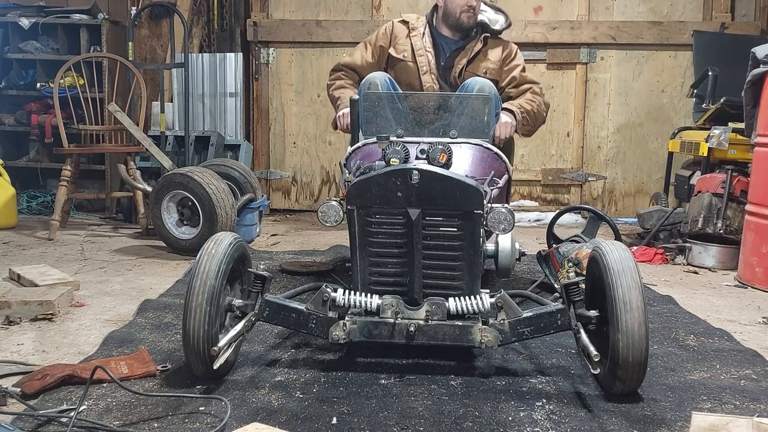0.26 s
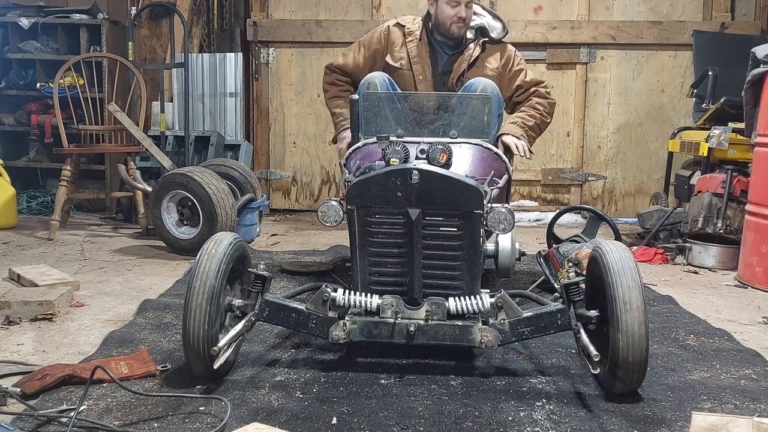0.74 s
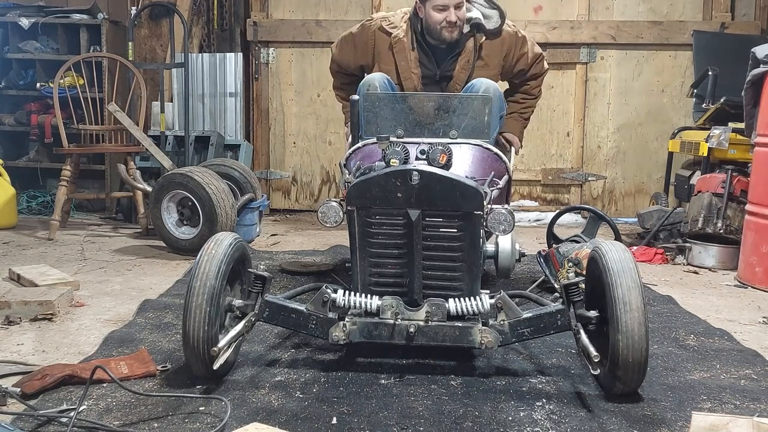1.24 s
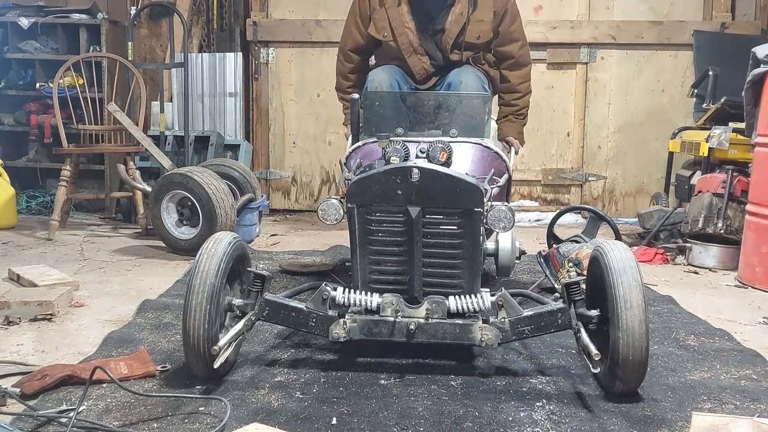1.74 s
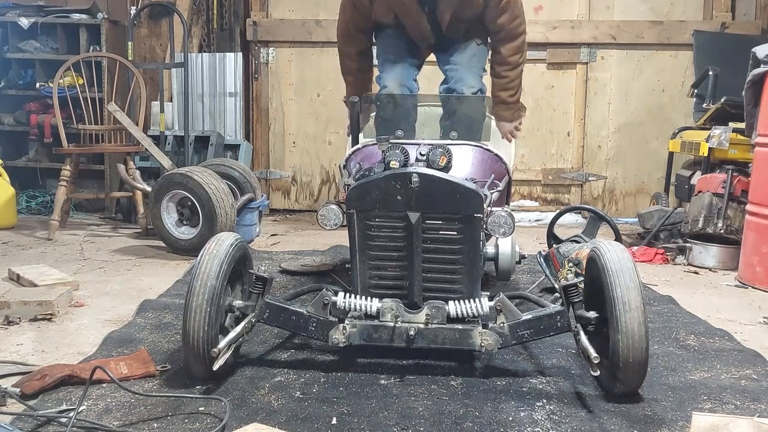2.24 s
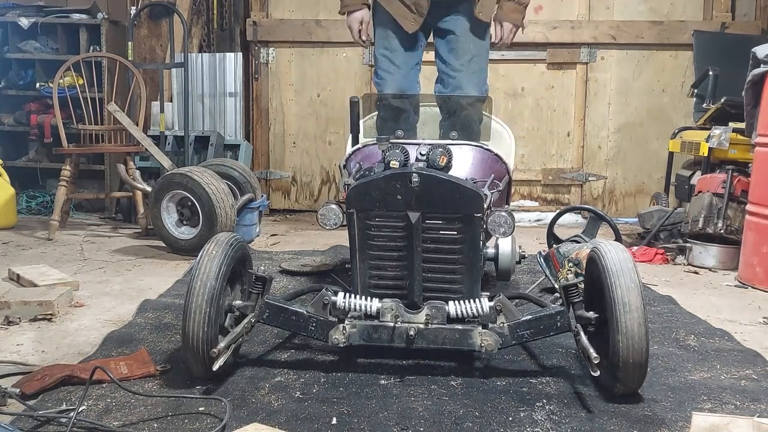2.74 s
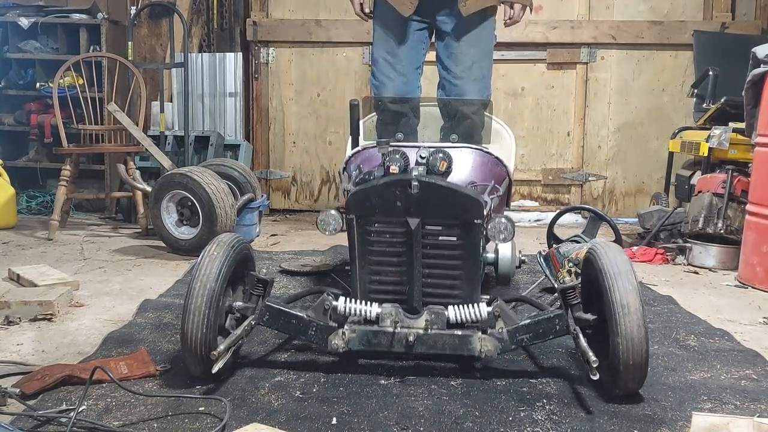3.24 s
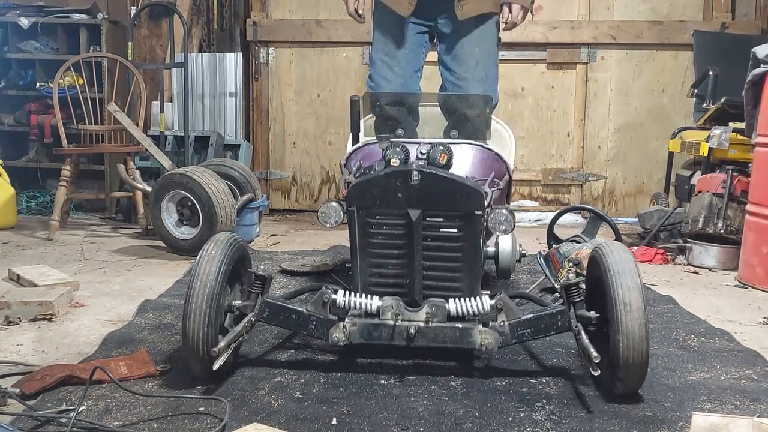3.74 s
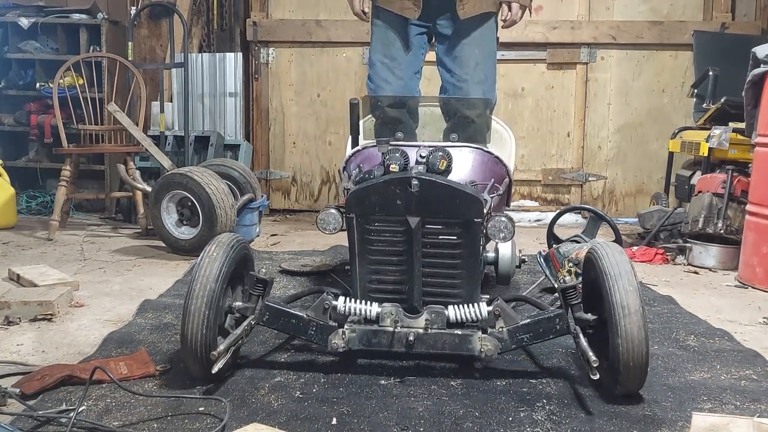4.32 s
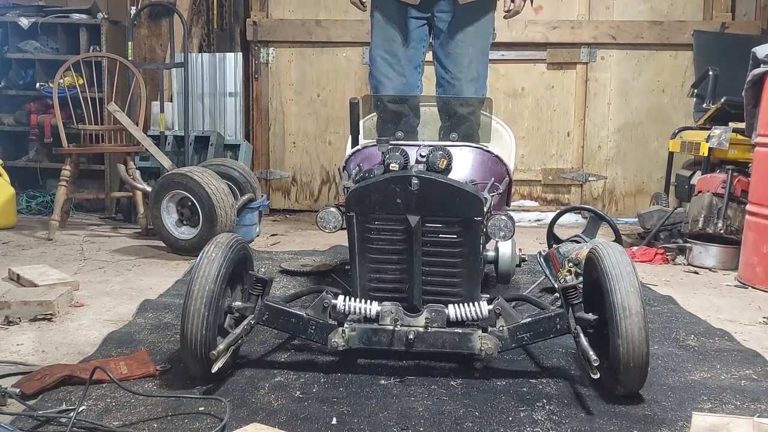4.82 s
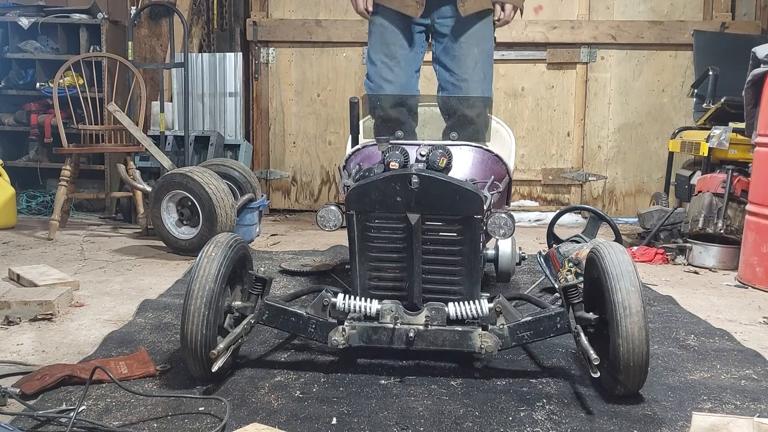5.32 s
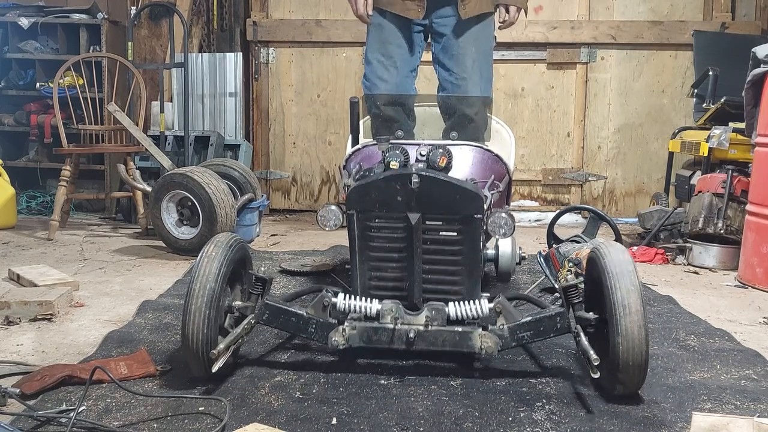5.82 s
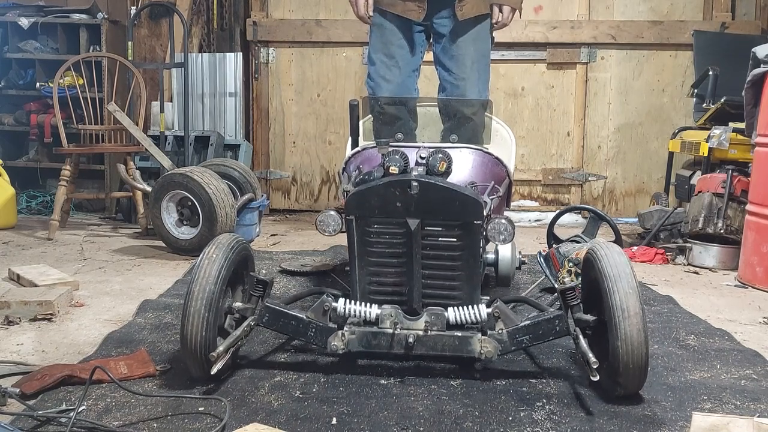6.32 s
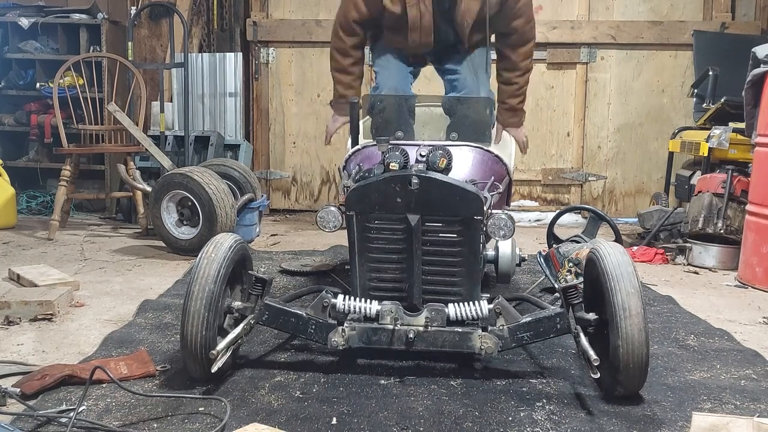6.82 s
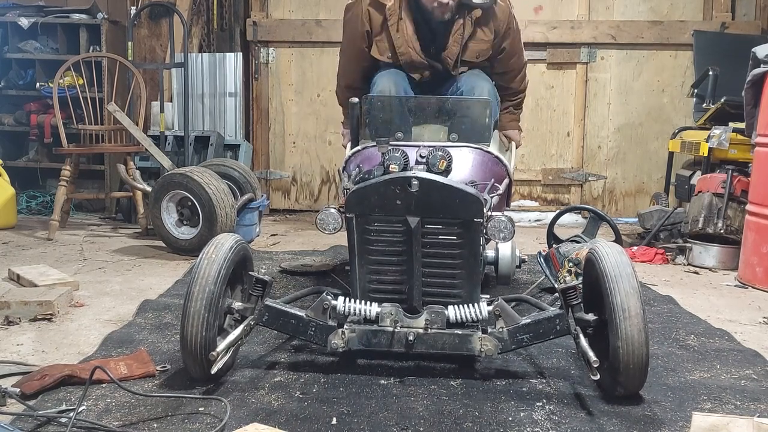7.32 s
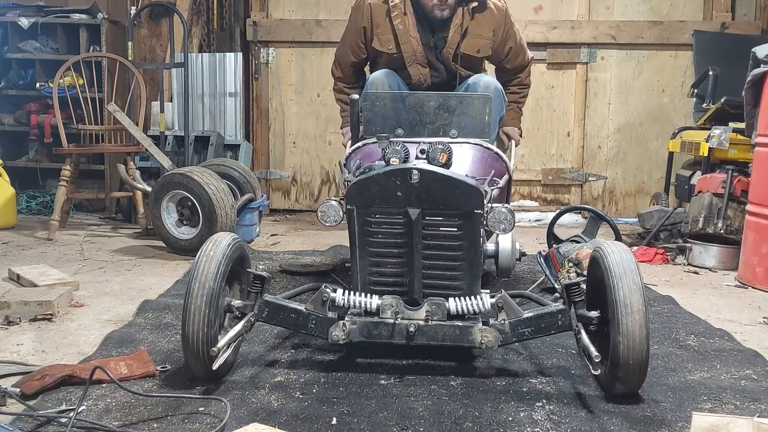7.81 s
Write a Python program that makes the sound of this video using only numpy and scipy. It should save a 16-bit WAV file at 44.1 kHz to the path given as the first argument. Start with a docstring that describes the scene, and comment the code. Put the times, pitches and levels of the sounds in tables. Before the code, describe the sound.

Close to a go-kart inside a workshop: light cloth rubbing and soft bumps, then a rapid run of deep body thuds with hard metal clunks. Quiet creaks follow, then busy suspension rattling with bright little clinks and dull tyre boom. It nearly stops, rumbles up again with scattered knocks, and settles after a low thud. Short wooden-room echo and slight steady hiss surround it.

```python
"""Soft thuds and shudders come first, over faint hiss: someone shifts weight, stands and bounces on a steel go-kart.
Slipping joints and blows excite the hollow body's modes; filtered noise makes the tyre boom and the hiss.
Random clicks make rattle and rubbing, knocks add bursts and short rings, narrow noise makes the creaks.
Loose steel parts clink as clusters of decaying sines, and feedback delays make the wooden workshop ring on."""
import sys
import numpy as np
from scipy import signal
from scipy.fft import rfft, irfft, next_fast_len
from scipy.io import wavfile

SR = 44100
rng = np.random.default_rng(int(sys.argv[2]) if len(sys.argv) > 2 else 0)


def file_out(sig):
    """Save sig as 16-bit WAV at sys.argv[1]."""
    # one column per channel
    cols = np.atleast_2d(sig).T
    # limit, then scale
    lim = np.clip(cols, -1, 1)
    pcm = np.round(lim * 32767).astype(np.int16)
    wavfile.write(sys.argv[1], SR, pcm)


N = 355518

# Levels in the event tables set the balance within a layer; the layer's function trims them.
# weight landing on the body: time_s, blow_level_db, strongest_pitch_hz, shudder_level_db,
# deep_panels_db (above the shudder)
THUMPS = [(0.042, -48.5, 302, -50, -22), (0.153, -34, 206, -32, -10), (0.244, -55, 248, -39.5, 3),
          (0.502, -47.5, 115, -60, 7), (0.959, -59, 210, -61, 2.5), (1.545, -45, 200, -43, -3),
          (1.569, -16.5, 151, -26.5, 4), (1.688, -17.5, 168, -24, 1), (1.743, -23, 235, -33.5, -5),
          (1.785, -10.5, 228, -18, 6), (1.86, -36.5, 231, -29, 1), (2.054, -34, 286, -31, -7.5),
          (2.305, -27.5, 192, -32, -2.5), (2.574, -33.5, 224, -42, -3.5), (2.861, -55, 153, -56, -2),
          (3.049, -55, 269, -41, -7), (3.207, -47, 213, -37, -5), (3.348, -44, 248, -34.5, -6),
          (3.57, -45, 293, -36, -14), (3.731, -33, 166, -37.5, -19), (3.907, -33.5, 229, -46.5, -2.5),
          (4.546, -39, 114, -53.5, 4), (5.42, -50.5, 236, -59, -17), (5.626, -33.5, 230, -33, -8.5),
          (5.703, -36, 229, -38, -12), (5.758, -47, 245, -45, -19), (6.627, -54, 229, -41, -12),
          (6.864, -40, 228, -56.5, 0), (7.515, -26.5, 162, -31, -14), (7.61, -40, 250, -46.5, 0.5),
          (7.861, -52.5, 123.4, -70.5, 5)]
# joints knocking: start_s, level_db, ring_pitch_hz, treble_level_db, sizzle_level_db, t60_s, left_over_right_db
KNOCKS = [(0.043, -58, 2350, -89, -96, 0.41, 3), (0.159, -47.5, 1230, -86, -77, 0.75, 2),
          (0.242, -47.5, 1780, -49.5, -59, 0.37, 2), (0.825, -63, 2040, -48.5, -52, 0.38, 1.5),
          (0.938, -68, 3290, -53.5, -75, 0.26, 0), (1.076, -58, 2360, -61.5, -68, 1, 4),
          (1.295, -65.5, 1280, -74, -99, 0.78, 10), (1.549, -69, 600, -83, -90, 0.12, -2),
          (1.576, -40.5, 1300, -61, -95, 0.56, 1), (1.686, -25.5, 1460, -65, -75, 0.46, 0.5),
          (1.786, -25.5, 1190, -35, -47, 0.27, -1), (1.871, -27, 3270, -42.5, -44, 0.31, 0),
          (2.056, -58, 1240, -61.5, -86, 0.27, 0.0), (2.318, -45.5, 1690, -63, -60, 0.14, 2),
          (2.793, -55, 1330, -64, -65, 0.55, 2), (2.899, -48.5, 1740, -62, -83, 0.23, 4),
          (2.927, -50, 1810, -62, -70, 0.17, 0), (3.077, -44, 2160, -55, -71, 0.51, 4),
          (3.092, -44, 2830, -41.5, -59, 0.5, 0), (3.162, -33.5, 2530, -66, -50.5, 0.25, 1),
          (3.248, -31.5, 1780, -73, -78, 0.1, 0), (3.318, -51, 1510, -64, -70, 0.43, 3),
          (3.407, -39, 1430, -58, -77, 0.095, -1), (3.483, -46, 2200, -55, -64, .1, -1),
          (3.493, -32, 2100, -53, -59, 0.21, 3.5), (3.558, -36.5, 1770, -65, -76, 0.31, 1),
          (3.723, -36, 1480, -66, -83, 0.13, 0.5), (3.82, -45.5, 2250, -69, -82, 0.33, 1),
          (3.853, -34, 2220, -58.5, -56.5, 0.33, 1.5), (3.948, -51, 1410, -63, -84, 0.19, 1),
          (4.409, -66.5, 2320, -92, -88, 0.2, 1.0), (4.464, -67.5, 1490, -86, -90, 0.13, 9),
          (5.414, -50, 2160, -54.5, -64, 0.25, 2), (5.505, -53, 2480, -88, -91.5, 0.21, 4.5),
          (5.598, -46.5, 700, -78, -87, 0.24, 1), (5.618, -39.5, 2900, -81, -87, 0.25, 2.5),
          (5.713, -53, 1500, -82, -85, 0.19, 1), (5.753, -34, 1330, -48, -59, 0.34, 1),
          (5.898, -35.5, 2460, -61, -57, 0.29, 0.5), (5.992, -65, 1720, -71, -82, 0.23, -3),
          (6.155, -42.5, 1360, -54.5, -73, 0.23, 2), (6.271, -52, 1310, -90, -88, 0.26, 4),
          (6.485, -39, 1380, -55.5, -86, 0.42, 1.5), (6.652, -42, 1950, -65, -68, 0.6, 1.5),
          (6.927, -58, 2010, -69, -82, 0.21, 6), (7.498, -42, 3030, -51.5, -58, 0.32, 3),
          (7.607, -61, 1300, -85, -82, 0.18, 2)]
# faint creaks: start_s, length_s, pitch_hz, level_db
CREAKS = [(0.054, 0.081, 2360, -77), (1.13, 0.11, 572, -71), (1.462, 0.086, 610, -67),
          (2.21, 0.098, 516, -58.5), (0.838, 0.17, 1304, -62.5), (4.46, 0.072, 1420, -73),
          (4.467, 0.12, 280, -69), (4.69, 0.13, 1990, -74.5), (4.7, 0.12, 1323, -82),
          (5.285, 0.043, 870, -76), (6.928, 0.057, 2040, -69), (7.118, 0.21, 2560, -72.5),
          (7.621, 0.41, 1350, -71), (5.419, 0.066, 2220, -64), (5.615, 0.026, 2900, -59),
          (0.953, 0.12, 970, -64), (1.311, 0.3, 1570, -70), (1.354, 0.17, 2956, -70)]
# modes of the hollow body, deepest first: pitch_hz, width_hz, level_db
BODY_MODES = [(111.5, 16, -5.5), (125.4, 25, -8.5), (152.5, 23, -5), (201.3, 48, -7), (236.3, 17.5, -4.5),
              (282.4, 23, -10), (328.7, 36, -6.5), (408.7, 84, -11.5), (528, 65, -14.5), (628, 75, -17),
              (726, 270, -19.5), (950, 83, -28.5)]
# colour of the rattling joints: pitch_hz, level_db (per Hz)
RATTLE_COLOUR = [(400, -1), (600, 1), (1000, -5), (1500, -5.5), (2300, -11.5), (2950, -15), (3400, -34),
                 (5000, -20)]
# colour of the rubbing: pitch_hz, level_db (per Hz)
RUB_COLOUR = [(1470, -29), (2500, 4.5), (2660, -8), (3420, -5.5), (4670, -7.5), (6560, -9), (10100, -16),
              (11500, -14.5), (15000, -45.5), (22000, -120)]
# colour of the room hiss: pitch_hz, level_db (per Hz)
HISS_COLOUR = [(18, -21.5), (30, -6.5), (93, -3.5), (194, -7), (245, -5.5), (328, -7.5), (801, -17),
               (2480, -21), (6050, -28), (8740, -14), (12300, -30), (13300, -44), (16000, -42)]
# stereo likeness: pitch_hz, likeness (1 same in both ears, 0 unrelated, -1 opposed)
LIKENESS = [(60, .99), (250, .95), (500, .8), (1000, .1), (2000, .2), (4000, -.2), (12000, -.05)]
# a loose steel rod: pitch_hz, level_db, t60_s
ROD_MODES = [(1515, -4, .1), (2850, 2, .13), (4490, -6, .12), (5750, -9, .18), (6420, -8, .16),
             (7390, -18, .12), (8390, -11, .15), (10200, -13, .18), (11800, -14, .15), (12600, -14, .15),
             (14100, -15, .15), (15300, -18, .12)]
# touches of the rod: start_s, level_db, brightest_pitch_hz
ROD_HITS = [(3.092, -35.5, 2850), (3.095, -37, 6500), (3.105, -41, 2850), (3.12, -36.5, 2930),
            (3.1, -41, 12180), (3.125, -46, 9000), (3.135, -44, 2850), (3.141, -36, 4900),
            (3.149, -43, 3200), (3.175, -49, 5300), (3.201, -46.5, 5550), (3.309, -40.5, 1500),
            (3.317, -48.5, 2830), (3.33, -39.5, 1500), (3.345, -45.5, 2380), (1.69, -56, 1508),
            (5.414, -58.5, 4460)]
# a steel bracket: pitch_hz, level_db, t60_s
BRACKET_MODES = [(1270, 0, .2), (2918, -8, .25), (3300, -4, .12), (4533, -2, .18), (4727, -5, .13),
                 (5647, -2, .2), (6471, -12, .15), (7127, -12, .2), (7477, -14, .2), (8506, -13, .2),
                 (10070, -10, .15), (12320, -16, .15), (14260, -14, .12)]
# touches of the bracket: start_s, level_db, brightest_pitch_hz
BRACKET_HITS = [(1.871, -37.5, 4500), (1.881, -41.5, 5600), (1.887, -42, 3000), (1.875, -41, 5700),
                (1.894, -42, 5200), (1.911, -44, 5700)]
# how hard the frame works under the shifting weight: time_s, rumble_level_db
LOAD = [(0, -69), (.4, -61), (.74, -84), (.9, -57.5), (1.01, -62), (1.23, -68), (1.32, -58.5), (1.52, -55),
        (2.2, -47), (2.5, -50.5), (2.78, -62), (2.92, -49.5), (3.1, -36.5), (3.6, -33.5), (3.88, -38),
        (4.11, -43), (4.3, -72.5), (4.4, -63.5), (4.5, -48), (4.65, -47.5), (4.85, -77.5), (4.96, -82.5),
        (5.36, -68), (5.46, -49.5), (5.84, -34.5), (6.02, -43), (6.2, -39), (6.28, -45.5), (6.55, -37),
        (6.78, -49.5), (6.98, -45), (7.2, -71.5), (7.3, -57.5), (7.47, -61.5), (7.81, -69.5), (8.06, -53.5)]
# kart bottoming out on its tyres: time_s (panels at full level), tyre_boom_db, deep_panels_db
BOUNCES = [(.16, -55, -60), (.26, -56, -55), (.52, -72, -60), (.9, -73, -64), (.98, -72, -66),
           (1.55, -70, -44), (1.68, -60, -40), (1.79, -47, -31), (1.97, -61, -40), (2.08, -68, -76),
           (2.33, -56, -55), (2.53, -58, -37), (2.98, -59, -38), (3.15, -49, -41.5), (3.3, -43, -41),
           (3.5, -56, -42), (3.61, -40, -49), (3.85, -55, -59), (3.98, -49.5, -36), (4.09, -55, -45.5),
           (4.28, -72, -66), (4.57, -48.5, -44), (4.68, -56, -49.5), (5.6, -52, -50), (5.75, -54, -54),
           (5.89, -48.5, -49), (6.05, -55, -40), (6.24, -71, -50), (6.38, -56, -37), (6.66, -60, -45),
           (6.75, -51.5, -36), (7.6, -48, -51)]
# cloth and hands rubbing along the kart: start_s, hold_s, hiss_level_db, rattle_level_db, left_over_right_db
RUBS = [(0.18, 0.051, -71, -63, 3), (0.822, 0.11, -54, -88, 3.5), (0.944, 0.064, -73, -70.5, 2),
        (1.272, 0.3, -77.5, -69, 4), (1.608, .12, -66.5, -66, 6), (1.75, 0.038, -50, -40.5, 6),
        (1.838, .1, -67, -62, 7), (2.073, .12, -66, -58, 4.5), (2.225, 0.098, -65.5, -60, 4),
        (2.523, 0.22, -71.5, -76.5, 5), (3.08, .22, -78, -63, -1), (3.352, 0.21, -71.5, -55, 4),
        (3.608, 0.15, -66, -60, 3.5), (3.98, 0.046, -76, -67.5, 6), (4.55, 0.096, -103, -103, 3),
        (5.891, 0.058, -72, -60, 6), (6.669, 0.073, -67.5, -65.5, 5), (6.827, 0.061, -77, -101, 3),
        (6.998, 0.096, -82.5, -79, 6), (7.122, 0.22, -74.5, -75, 4.5), (7.374, .07, -79.5, -76.5, 5),
        (7.503, 0.086, -79, -60, 5), (7.618, 0.051, -79, -69.5, 6), (7.71, 0.264, -83.5, -86, 3)]
# frame tubes ringing in the rattle: pitch_hz, width_hz, level_db
TUBES = [(534, 10, -0.5), (806, 16, 0), (950, 35, -1), (1217, 40, -1), (1509, 13, 0.5), (1969, 62, -5),
         (2570, 90, -1), (2900, 270, -3)]

HISS_DB = -77
SLIPS_PER_S, RATTLE_GRAINS_PER_S, RUB_GRAINS_PER_S = 900, 3000, 9000
SHED_T60_S, SHED_DB, WALL_CUT_HZ = 0.31, -13.5, 5000   # t60 of the lows
CUTOFF_HZ = 16300   # 60 dB down from here up
TYRE_HZ, TYRE_WIDTH_HZ = 58.4, 22   # width of one resonance pass
DEEP_DB, TYRE_DB = -8, -29.5   # deepest panels and tyres against the load
RATTLE_DB, RUB_DB = -81, -87.5   # when the rumble stands at -50 dB
RATTLE_FOLLOWS, RUB_FOLLOWS = 0.83, 0.48   # share of the rumble's swing in dB
SHUDDER_RISE_S, SHUDDER_HOLD_S, SHUDDER_T60_S, DEEP_T60_S = 0.038, 0.037, 0.3, 0.38
BOUNCE_RISE_S, BOUNCE_HOLD_S, BOUNCE_T60_S = 0.04, 0.015, 0.15
TYRE_LAG_S, TYRE_T60_S = 0.027, 0.33   # the boom follows the panels
RUB_RISE_S, RUB_T60_S, RUB_SIDE_DB = 0.038, 0.2, 5


def from_db(db):
    """Decibels to gain."""
    return 10 ** (np.asarray(db) / 20)


def rms_one(x):
    """Scale to unit rms."""
    return x / np.sqrt(np.mean(x ** 2) + 1e-20)


def at_hz(points, hz):
    """Read a table on a log-frequency axis."""
    table = np.array(points)
    return np.interp(np.log(hz), np.log(table[:, 0]), table[:, 1])


def panned(pan_db):
    """Left and right gains, pan_db apart."""
    return from_db(np.array([pan_db / 2, -pan_db / 2]))


def grains(per_s, spread_db):
    """Two unrelated trains of random clicks of uneven size and sign; rms 1."""
    extra_db = spread_db * np.minimum(rng.exponential(1, (2, N)), 5)
    sizes = from_db(extra_db) * rng.choice([-1, 1], (2, N))
    fires = rng.random((2, N)) < per_s / SR
    return rms_one(sizes * fires + 1e-9)


def spread(pair, hz):
    """Mix a shared and an opposed part so left and right are as alike as LIKENESS says at this pitch."""
    alike = np.clip(at_hz(LIKENESS, hz), -1, 1)
    shared = np.sqrt(1 + alike) * pair[0]
    opposed = np.sqrt(1 - alike) * pair[1] * [[1], [-1]]
    return shared + opposed


def coloured(pair, spectrum):
    """Bands of about a third octave, each with its own level and stereo width; rms 1."""
    bottom, top = spectrum[0][0], spectrum[-1][0]
    edges = np.geomspace(bottom, top, 1 + int(3 * np.log2(top / bottom)))
    out = 0
    for k, (low, high) in enumerate(zip(edges, edges[1:])):
        band_filter = signal.butter(2, [low, high], "band", fs=SR, output="sos")
        band = signal.sosfilt(band_filter, pair)
        hz = np.sqrt(low * high)
        out = out + (-1) ** k * from_db(at_hz(spectrum, hz)) * spread(band, hz)
    return rms_one(out)


def resonate(x, hz, width_hz):
    """Two-pole resonance with a peak gain of 1."""
    r = np.exp(-np.pi * width_hz / SR)
    feed = np.array([1, 0, -1]) * (1 - r * r) / 2
    return signal.lfilter(feed, [1, -2 * r * np.cos(2 * np.pi * hz / SR), r * r], x)


def dying(s, t60):
    """First sample and falling envelope of one hit."""
    i = round(s * SR)
    samples = np.arange(min(N - i, int(t60 * SR)))
    return i, from_db(-60 * samples / (t60 * SR))


def swells(rows, rise_s, t60):
    """Sum of envelopes (time_s, hold_s, level_db): each rises up to its time, holds and dies away."""
    out = np.zeros(N)
    for s, hold_s, db in rows:
        i = max(0, round((s - rise_s) * SR))
        t = np.arange(min(N - i, int((rise_s + hold_s + t60) * SR))) / SR
        rise = np.minimum(1, t / rise_s) ** 2
        fall_db = 60 * np.maximum(0, t - rise_s - hold_s) / t60
        out[i:i + len(t)] += rise * from_db(db - fall_db)
    return out


def motion():
    """Drive rumble, deep panels, tyres, rattle and rubbing from the load plus thump, bounce and rub swells."""
    load = from_db(np.interp(np.arange(N) / SR, *np.transpose(LOAD)))
    shudders = [(s, SHUDDER_HOLD_S, db) for s, _, _, db, _ in THUMPS]
    deep_shudders = [(s, SHUDDER_HOLD_S, db + up_db) for s, _, _, db, up_db in THUMPS]
    deep_bounces = [(s, BOUNCE_HOLD_S, db) for s, _, db in BOUNCES]
    tyre_bounces = [(s + TYRE_LAG_S, BOUNCE_HOLD_S, db) for s, db, _ in BOUNCES]

    rumble = load + swells(shudders, SHUDDER_RISE_S, SHUDDER_T60_S)
    deep = from_db(DEEP_DB) * load
    deep += swells(deep_shudders, SHUDDER_RISE_S, DEEP_T60_S)
    deep += swells(deep_bounces, BOUNCE_RISE_S, BOUNCE_T60_S)
    bounce = from_db(TYRE_DB) * load + swells(tyre_bounces, BOUNCE_RISE_S, TYRE_T60_S)

    work = rumble / from_db(-50)
    rub_rattles = [(s + RUB_RISE_S, hold, db) for s, hold, _, db, _ in RUBS]
    rattling = from_db(RATTLE_DB) * work ** RATTLE_FOLLOWS
    rattling += swells(rub_rattles, RUB_RISE_S, RUB_T60_S)
    rubbing = from_db(RUB_DB) * work ** RUB_FOLLOWS * panned(RUB_SIDE_DB)[:, None]
    for side, way in enumerate((1, -1)):   # left, right
        strokes = [(s + RUB_RISE_S, hold, db + way * side_db / 2) for s, hold, db, _, side_db in RUBS]
        rubbing[side] += swells(strokes, RUB_RISE_S, RUB_T60_S)
    return rumble, deep, bounce, rattling, rubbing


def room_hiss():
    """Steady coloured noise lies under everything."""
    return from_db(HISS_DB) * coloured(rng.standard_normal((2, N)), HISS_COLOUR)


def body(rumble, deep):
    """Uneven slips shake the body all along; a thump is one soft blow, strongest in the modes near its pitch."""
    slips = grains(SLIPS_PER_S, spread_db=1.2)
    s, blow_db, strong_hz = np.transpose(THUMPS)[:3]
    out = 0
    for k, (hz, width_hz, db) in enumerate(BODY_MODES):
        drive = deep if k < 2 else rumble   # two deepest modes are the deep panels
        force = from_db(db - 36.5) * drive * slips
        off_pitch_db = 10 * np.abs(np.log2(hz / strong_hz))
        force[0, np.round(s * SR).astype(int)] += from_db(blow_db + db - 4.5 - off_pitch_db)
        # two passes: builds up softly and leaves dark valleys between modes
        twice = resonate(resonate(force, hz, width_hz), hz, 3.3 * width_hz)
        out = out + (-1) ** k * spread(twice, hz) * SR / (np.pi * width_hz)
    return out


def tyres(bounce):
    """The air in the tyres booms with every bounce: noise through a low resonance, twice."""
    boom = rng.standard_normal((2, N))
    for _ in range(2):
        boom = resonate(boom, TYRE_HZ, TYRE_WIDTH_HZ)
    return bounce * rms_one(spread(boom, TYRE_HZ))


def joints(rattling, rubbing):
    """Rattle and rubbing follow the load; every knock adds a short ring and a burst that dies away."""
    rattle = coloured(grains(RATTLE_GRAINS_PER_S, spread_db=3.5), RATTLE_COLOUR)
    rub = coloured(grains(RUB_GRAINS_PER_S, spread_db=3.0), RUB_COLOUR)
    sizzle = coloured(grains(9000, spread_db=2.5), [(10500, 0), (21000, -6)])
    # the frame tubes ring in every rattle
    rattle = rattle + sum(from_db(db) * resonate(rattle, hz, width_hz) for hz, width_hz, db in TUBES)

    low = rattling * panned(1.2)[:, None]
    high = rubbing.copy()
    top = from_db(-6.0) * rubbing
    rings = np.zeros((2, N))
    chatter = rng.standard_normal((len(KNOCKS), 2, SR // 2))
    for (s, level_db, hz, treble_db, top_db, t60, side_db), noise in zip(KNOCKS, chatter):
        i, fall = dying(s, np.clip(t60, .01, .49))   # fits the half second of chatter
        attack = np.minimum(1, np.arange(len(fall)) / (0.0041 * SR))
        fall = fall * attack * panned(side_db)[:, None]
        length = fall.shape[1]
        span = slice(i, i + length)
        low[:, span] += from_db(level_db - 11.0) * fall
        high[:, span] += from_db(treble_db - 3.5) * fall ** 1.2   # treble dies sooner
        top[:, span] += from_db(top_db + 3) * fall ** 2.0   # sizzle soonest
        ring = resonate(resonate(noise, hz, 600), hz, 600)
        ring = rms_one(spread(ring, hz))[:, :length]
        rings[:, span] += from_db(level_db - 13.5) * ring * fall ** 1.5
    return low * rattle + high * rub + top * sizzle + rings


def creaks():
    """Fine slips, as noise, sing in one narrow resonance for a moment."""
    out = np.zeros((2, N))
    for s, length, hz, db in CREAKS:
        i, n = round(s * SR), round(length * SR)
        slips = rng.standard_normal((2, SR // 2))[:, :n]
        tone = spread(resonate(slips, hz, width_hz=.05 * hz), hz)
        swell = np.sin(np.pi * (np.arange(n) / n) ** .5)   # peaks early
        out[:, i:i + n] += from_db(db) * rms_one(tone) * swell
    return out


def clinks(modes, hits):
    """Where a part is touched decides which modes ring most; each mode is a close, beating cluster."""
    s, level_db, bright_hz = np.transpose(hits)
    touched = np.round(s * SR).astype(int)
    start = round(min(s) * SR)
    out = np.zeros((2, N))
    for hz, db, t60 in modes:
        r = from_db(-60 / (t60 * SR))
        strength = from_db(level_db + db - 12 * np.abs(np.log2(hz / bright_hz)))
        for split, share in [(.985, .4), (.994, .5), (1, 1), (1.009, .5)]:   # pitch ratio, gain
            w = 2 * np.pi * hz * split / SR
            clicks = np.zeros((2, N)) + 1e-18
            clicks[:, touched] = share * strength * rng.choice([-1, 1], (2, len(s)))
            ringing = [1, -2 * r * np.cos(w), r * r]
            out[:, start:] += signal.lfilter([0, np.sin(w)], ringing, clicks[:, start:])
    return out * panned(3.4)[:, None]


def shed(x):
    """Workshop echo: sixteen feedback delays a side, duller on every round."""
    size = next_fast_len(N + SR)
    z = np.exp(-2j * np.pi * np.arange(size // 2 + 1) / size)   # one sample of delay
    response = np.zeros((2, size // 2 + 1), complex)
    dull = np.exp(-2 * np.pi * WALL_CUT_HZ / SR)
    wall = (1 - dull) / (1 - dull * z)   # gentle lowpass
    for k, lag in enumerate(np.geomspace(.019, .071, 32)):   # s
        loop = from_db(-60 * lag / SHED_T60_S) * wall * z ** round(lag * SR)
        response[k % 2] += loop / (1 - loop) * (-1) ** (k // 2)
    return irfft(response * rfft(x, size), size)[:, :N]


def scene():
    """The kart in the workshop over the room hiss; only the steel and rubbing feed the echo."""
    rumble, deep, bounce, rattling, rubbing = motion()
    kart = body(rumble, deep) + tyres(bounce)
    steel = joints(rattling, rubbing) + creaks()
    steel += clinks(ROD_MODES, ROD_HITS) + clinks(BRACKET_MODES, BRACKET_HITS)
    return kart + steel + from_db(SHED_DB) * shed(steel) + room_hiss()


def record(dry):
    """A steep lowpass cuts the top."""
    top_cut = signal.cheby2(12, 60, CUTOFF_HZ, fs=SR, output="sos")
    return signal.sosfilt(top_cut, dry)


dry = scene()
out = record(dry)
file_out(out)
```